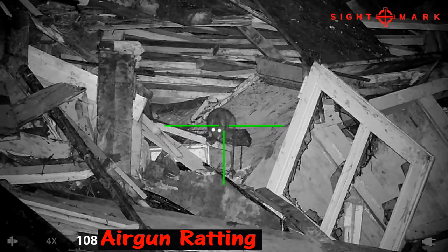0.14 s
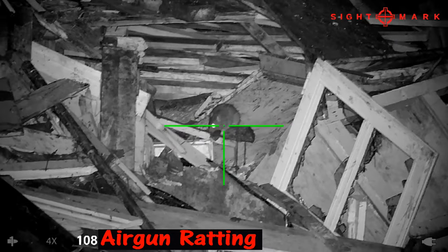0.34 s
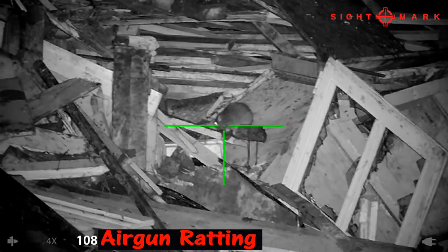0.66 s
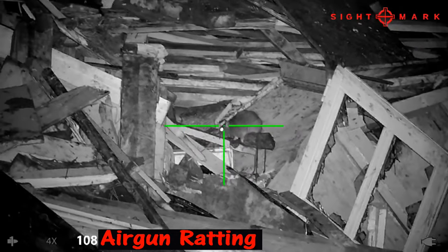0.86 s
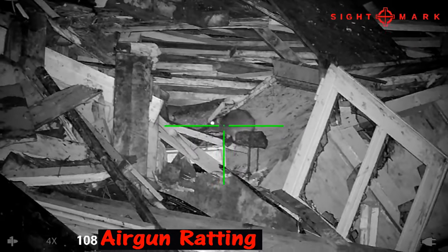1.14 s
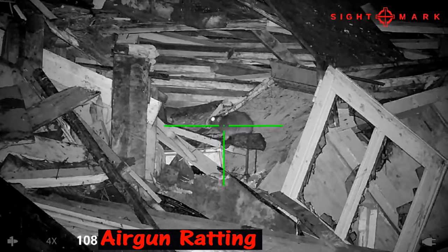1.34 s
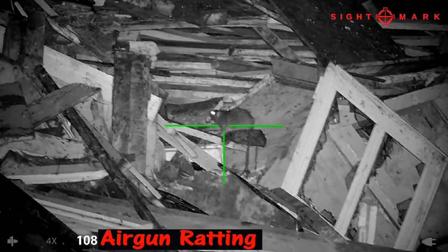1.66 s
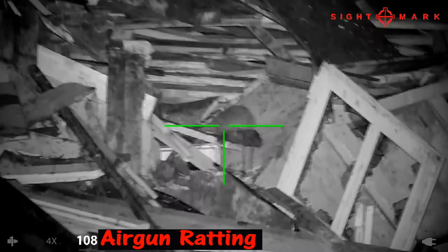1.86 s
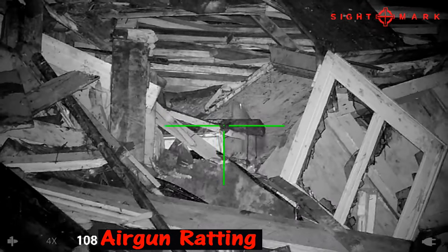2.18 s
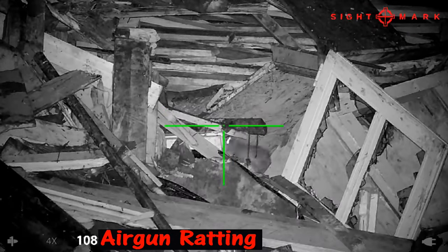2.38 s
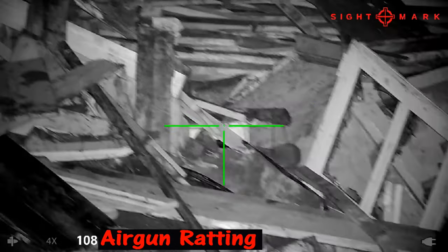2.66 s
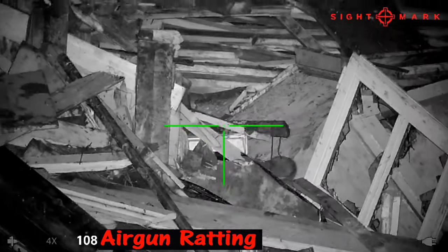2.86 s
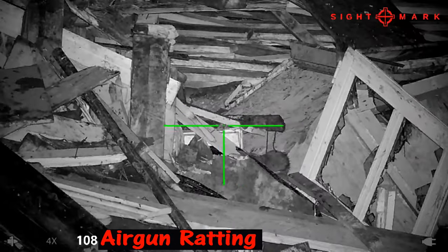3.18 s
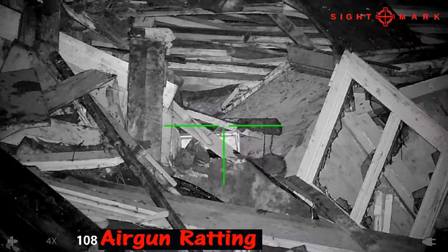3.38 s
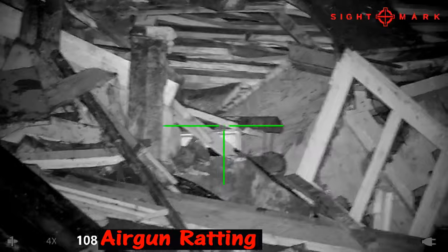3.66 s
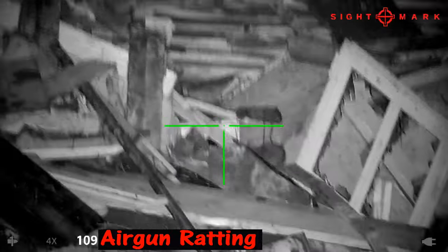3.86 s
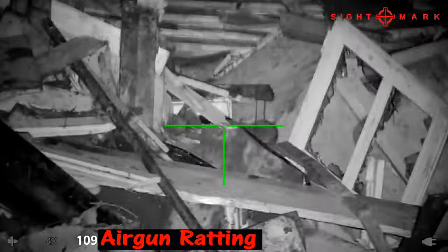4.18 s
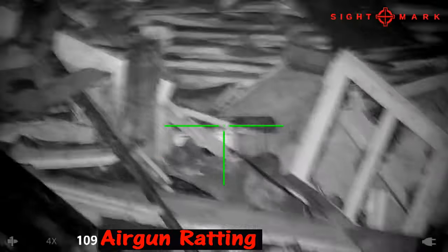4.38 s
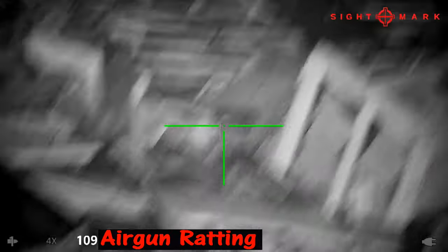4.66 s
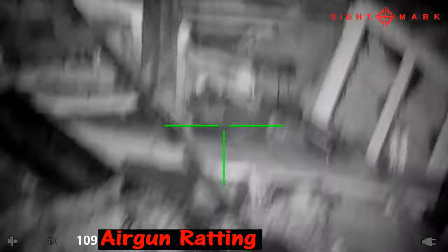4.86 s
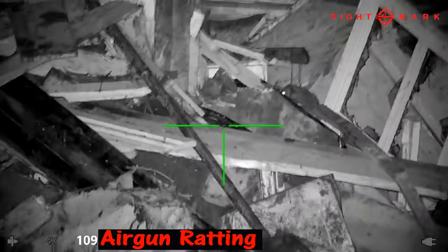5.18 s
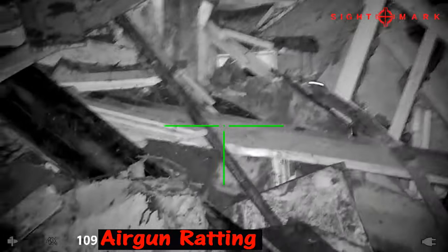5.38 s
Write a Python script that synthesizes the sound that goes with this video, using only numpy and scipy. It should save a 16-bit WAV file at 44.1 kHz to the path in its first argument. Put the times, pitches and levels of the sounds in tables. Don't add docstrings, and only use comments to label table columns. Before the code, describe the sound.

Quiet night hiss, a sharp overloaded air-gun blast, a woody smack and rattling echoes, later metal clicks as the gun is recocked.

```python
import sys
import numpy as np
from scipy import signal
from scipy.fft import rfft, irfft
from scipy.io import wavfile

SR = 44100
rng = np.random.default_rng(int(sys.argv[2]) if len(sys.argv) > 2 else 0)


def volts(x):
    e = np.asarray(x, float) / 20
    return 10 ** e


def inscribe(sig):
    pcm = np.round(np.clip(np.atleast_2d(sig).T, -1, 1) * 32767)
    wavfile.write(sys.argv[1], SR, pcm.astype(np.int16))


N = 243873
TIME = np.arange(N) / SR
SOFT_DB = -60


def shaped(x, spectrum):
    hz, db = np.transpose(spectrum)
    grid = np.maximum(np.fft.rfftfreq(len(x), 1 / SR), 1)
    gain = volts(np.interp(np.log(grid), np.log(hz), db))
    y = irfft(rfft(x) * gain, len(x))
    return y / np.sqrt(np.mean(y ** 2))


def drift(rate):
    hop, settle = 40, 2000
    r = np.exp(-2 * np.pi * hop * rate / SR)
    white = rng.standard_normal(N // hop + settle + 2)
    slow = signal.lfilter([1], [1, -2 * r, r * r], white)[settle:]
    return np.interp(np.arange(N) / hop, np.arange(len(slow)), slow / slow.std())


def decay(start, rise, t60, time=TIME):
    t = np.maximum(time - start, 0)
    return (1 - np.exp(-t / rise)) ** 2 * volts(-60 * t / t60)


def ring(x, hz, t60):
    r, w = volts(-60 / (t60 * SR)), 2 * np.pi * hz / SR
    return signal.lfilter([0, np.sin(w)], [1, -2 * r * np.cos(w), r * r], x + 1e-18)


def band(x, low_hz, high_hz):
    sos = signal.butter(2, [low_hz, min(high_hz, SR / 2.2)], "band", fs=SR, output="sos")
    return signal.sosfilt(sos, x) * np.sqrt(SR / 2 / (high_hz - low_hz))


def high_pass(x, order, hz):
    return signal.sosfilt(signal.butter(order, hz, "high", fs=SR, output="sos"), x)


def top_one(x):
    return x / np.abs(x).max()


def placed(x, start):
    out, at = np.zeros(N), round(start * SR)
    out[at:at + len(x)] = x[:N - at]
    return out


def yard_tail(colour, rise, lumps_db):
    # pitch_hz, t60_s
    yard_t60 = [(300, 1.3), (800, 0.74), (2000, 1.146), (3300, 0.98), (4900, 1.0), (6500, .55),
                (9000, 0.55), (14000, .4)]
    hz, t60 = np.transpose(yard_t60)
    time, out = TIME[:int(1.3 * SR)], 0
    noises = [shaped(white, colour) for white in rng.standard_normal((2, len(time)))]
    edges = 140 * 2 ** np.arange(0, 7.1, .5)
    for k, (low, high) in enumerate(zip(edges, edges[1:])):
        sos = signal.butter(2, [low, high], "band", fs=SR, output="sos")
        band_t60 = np.interp(np.log(low * high) / 2, np.log(hz), t60)
        out = out + signal.sosfilt(sos, noises[k % 2]) * decay(0, rise, band_t60, time)
    return out * volts(lumps_db * drift(25)[:len(time)])


def struck(rows, load, loose_db):
    lead = 6 * load
    out, time = np.zeros(N), TIME[:20000] - lead
    flutter = drift(40)
    for (s, hz, db, t60), phase in zip(rows, rng.uniform(0, 2 * np.pi, len(rows))):
        swell = np.exp(np.minimum(time, 0) / load)
        free = volts(-60 * np.maximum(time, 0) / t60)
        waver = volts(loose_db * flutter[rng.integers(N // 2):][:len(time)])
        shape = np.where(time < 0, swell, free) * waver
        out += volts(db) * placed(shape * np.sin(2 * np.pi * hz * time + phase), s - lead)
    return out


def night():
    # pitch_hz, level_db per Hz
    hum_colour = [(35, -40.5), (60, -9), (134, -1), (249, -2.5), (279, -1.5), (644, -8), (699, -7),
                  (734, -9.5), (908, -11.5), (1370, -19.5), (3000, -28.5), (3900, -55), (6600, -120)]
    # pitch_hz, level_db rms
    motor_lines = [(140.0, -83), (274.5, -83)]
    # pitch_hz, level_db per Hz
    hiss_colour = [(880, -30.5), (1500, -4), (2270, -6), (2460, -6), (3770, -3.5), (13300, -10),
                   (15800, -11.5), (16100, -45)]
    # start_s, hum_db
    road_level = [
        (0, -75),
        (.5, -74.5),
        (1.35, -71.5),
        (1.7, -73),
        (3.3, -70.5),
        (4.05, -65),
        (4.55, -66),
        (4.85, -64),
        (5.53, -68),
    ]
    # start_s, thud_db
    hand_level = [
        (0, -74.5),
        (.3, -77),
        (1.0, -75.5),
        (1.35, -86),
        (2.5, -74.5),
        (3.5, -78.5),
        (4.25, -79.5),
        (4.65, -63.5),
        (5.35, -80.5),
    ]
    hum_db = np.interp(TIME, *np.transpose(road_level))
    thud_db = np.interp(TIME, *np.transpose(hand_level))
    stir_db = thud_db + 78
    road = [shaped(white, hum_colour) for white in rng.standard_normal((3, N))]
    hum = band(road[0], 150, 600) * volts(hum_db - 16 + 0.9 * drift(8))
    rush = band(road[1], 540, 4000) * volts(-75 + .15 * stir_db + 0.8 * drift(8))
    thud = band(road[2], 53, 180) * volts(thud_db - 18 + 3.5 * drift(6.2))
    lines = sum(volts(db + 1.5 + 1.3 * drift(2)) * np.sin(2 * np.pi * hz * TIME) for hz, db in motor_lines)
    wind_colour = [(10, -10), (22, 1.5), (40, -7), (70, -15), (120, -41.5), (400, -100)]
    wind = shaped(rng.standard_normal(N), wind_colour)
    wind *= volts(-74 + 1.1 * stir_db + 2.5 * drift(4))
    hiss = volts(-76.4) * shaped(rng.standard_normal(N), hiss_colour)
    return hum + rush + thud + lines + wind + hiss


def shot():
    hammer_s, blast_s = 1.8145, 1.8213
    # pitch_hz, level_db per Hz
    blast_colour = [(88, -39), (150, -11), (259, -15.5), (514, -6), (1020, -7), (1690, -3.5), (2140, -9),
                    (3290, -2.5), (4760, -0.5), (5790, -7.5), (6390, -3), (9820, -5.5), (16000, -25)]
    # pitch_hz, level_db, t60_s
    stock_modes = [(105, -36, 0.36), (129.5, -35, .26), (235, -46, .22), (162, -36, 0.087),
                   (209, -31.5, 0.042), (696, -13, 0.026), (400.6, -28.5, .07)]
    # pitch_hz, level_db per Hz
    near_colour = [(120, -30.5), (230, -12), (330, -12.5), (700, -4), (1020, -5), (2170, -8.5), (4770, -4),
                   (7830, -7), (11000, -14.5), (16000, -27.5)]
    air = shaped(rng.standard_normal(N), blast_colour)
    t = np.maximum(TIME - blast_s, 0)
    shutting_db = -np.minimum(30 * (t / 0.044) ** 4.5, 90)
    valve = decay(blast_s, 0.00056, 0.3016) * volts(shutting_db)
    hammer = band(rng.standard_normal(N), 900, 9000) * decay(hammer_s, 0.0013, 0.058)
    recoil = decay(blast_s, 0.002099, .06) * rng.standard_normal(N) * .05
    recoil[round(blast_s * SR)] += 1
    thump = 0
    for hz, db, t60 in stock_modes:
        late = np.roll(recoil, round(1.1 * SR / hz))
        thump = thump + volts(db) * ring(late, hz, t60)
    settle = volts(-37.5) * air * decay(blast_s, .01, 0.44)
    wall = volts(-39.5) * placed(yard_tail(near_colour, .008, lumps_db=0), blast_s + 0.071)
    dull = band(air, 1500, 7000) * .45
    jet = dull + (air - dull) * decay(blast_s, 0.0045, 1)
    turbulence = volts((0.4 + 34 * np.minimum(t, .05)) * drift(400.8))
    return volts(-5) * jet * turbulence * valve + volts(-35) * hammer + thump + settle + wall


def smack():
    smack_s = 1.9948
    # pitch_hz, level_db per Hz
    smack_colour = [(120, -48.5), (200, -24.5), (1060, 0), (1710, -6.5), (2380, 0.5), (2910, -11),
                    (3490, -1.5), (3970, -6), (4770, 2.5), (5940, -12.5), (6520, -5.5), (7410, -13),
                    (16000, -34)]
    # pitch_hz, level_db per Hz
    far_colour = [(120, -46), (250, -13), (500, -4), (900, 2), (1300, 2), (1700, -5), (2100, 0),
                  (2600, -8.5), (3800, -12), (5000, -7), (5500, -21), (7000, -22.5), (9000, -25.5),
                  (16000, -44.5)]
    # delay_s, level_db, t60_s
    wall_echoes = [
        (0.016, -11.5, 0.044),
        (0.019, -11.5, 0.031),
        (0.047, -14, 0.051),
        (.134, -17, .03),
        (.155, -37, 0.033),
        (.215, -33.5, .1),
        (.243, -25, 0.029),
        (0.303, -35.5, 0.15),
    ]
    # pitch_hz, level_db, t60_s
    plank_modes = [(382.6, -34.5, .035), (760, -25, .035), (980, -22, 0.041), (1125, -25.5, 0.037),
                   (1450, -19.5, 0.017), (1945, -24, 0.034), (2471, -25, .025), (3560, -29, .025),
                   (4880, -19, 0.02), (5278, -26.5, 0.0298), (6373, -30, 0.026)]
    wood = shaped(rng.standard_normal(N), smack_colour) * volts(1.33 * drift(300))
    far = shaped(rng.standard_normal(N), far_colour)
    echoes = sum(volts(db) * decay(smack_s + s, .0018, t60) for s, db, t60 in wall_echoes)
    split = volts(-9 * np.clip((TIME - smack_s - .0088) / 0.00115, 0, 1))
    direct = decay(smack_s, .0002, 0.093) * split + 0.3976 * decay(smack_s, 0.00013, 0.01145)
    hit = wood * direct + (far + 0.32 * wood) * echoes
    hit = high_pass(hit, 4, 300)
    tail = volts(-42) * placed(yard_tail(far_colour, .004, lumps_db=1.7), smack_s)
    modes = [(smack_s + .0012, hz, db, t60) for hz, db, t60 in plank_modes]
    body = high_pass(struck(modes, load=0.00019, loose_db=3), 4, 280)
    return volts(-17) * hit + body + tail


def touches():
    # start_s, level_db (peak), pitch_hz (main ring), brightness_db
    ticks = [(2.65, -59, 1700, 0), (2.655, -55, 1150, 6), (2.7147, -67, 3370, 4), (2.746, -67, 2280, 0),
             (2.832, -68, 6000, 10), (3.6894, -60, 3700, 6), (4.1069, -51, 3480, 14),
             (4.4153, -45, 3900, 6), (4.4253, -30.5, 3300, -4), (4.4831, -63, 4540, -6),
             (4.6, -41, 3080, -9), (4.6149, -52, 2800, 4), (4.6229, -25.5, 4160, 2.5),
             (4.649, -27.5, 3720, 9.5), (4.653, -31.5, 3700, 17), (4.6637, -51.5, 2690, -13),
             (4.7186, -51, 4070, 19), (4.801, -57, 3120, -17.5), (4.8077, -41, 3100, 6),
             (4.894, -52, 3660, 20), (4.9145, -48.5, 3780, 7), (4.925, -57, 2240, 2),
             (5.0008, -58, 3700, 0), (5.0128, -64, 3960, 2), (5.3583, -62, 3230, 11),
             (5.4845, -58, 4200, 3)]
    # start_s, level_db (peak), pitch_hz (main ring), brightness_db
    rattles = [
        (4.3396, -52.5, 4050, -4),
        (4.3852, -46.5, 4020, 1),
        (4.4261, -29, 3260, 0),
        (4.498, -59.5, 4010, 2),
        (4.5827, -53.5, 3100, -8),
        (4.6253, -30, 3770, 4),
        (4.8206, -41, 2930, -4.5),
        (4.8994, -49, 3970, -2),
        (5.0477, -45, 4100, -0.5),
        (5.3314, -66, 4570, 7),
    ]
    bounce_s, stretch = 0.0056, 1.8
    rows = ticks + rattles
    for (s, db, hz, bright_db), (up, down) in zip(rattles, rng.normal(0, 0.088, (len(rattles), 2))):
        loss_db = 1.5 + 0.44 * (db - SOFT_DB)
        first = (s + bounce_s, db - loss_db, hz * np.exp(up), bright_db)
        second_s = s + bounce_s * (1 + stretch)
        second = (second_s, db - 1.8 * loss_db, hz * np.exp(down), bright_db - 6)
        rows += [first, second]
    return rows


def contacts():
    time, out, rows = TIME[:3000], np.zeros(N), touches()
    noise = rng.standard_normal((len(rows), len(time)))
    for white, (s, db, hz, bright_db) in zip(noise, rows):
        burst = white * decay(0, 0.0005, 0.018, time)
        core = top_one(band(burst, hz * 0.87, hz * 1.17))
        skirt = top_one(band(burst, hz * 0.62, hz * 1.74))
        body = top_one(band(band(burst, 1160, 1660), 860, 2020))
        edge = top_one(band(burst, 6030, 9600) + 0.61 * band(burst, 11200, 15500))
        edge_db = -19 + 0.86 * bright_db - .2 * (db - SOFT_DB)
        zones = top_one(core + 1.28 * skirt) + volts(-12 - bright_db) * body + volts(edge_db) * edge
        out += volts(db + 2) * placed(zones, s - .0005)
    return out


def stops():
    open_s, shut_s = 4.428, 4.6465
    # pitch_hz, level_db, t60_s
    open_ring = [(1307, -51, .12), (2860, -60, .2), (2905, -60, 0.32), (3500, -63, .16), (4500, -46, 0.035),
                 (8100, -39, 0.0094), (714, -44.5, 0.016)]
    # pitch_hz, level_db, t60_s
    shut_ring = [(1300, -35, 0.017), (1820, -32.5, .012), (3605, -26, 0.018), (6428, -60, .12),
                 (9600, -58, .4), (9700, -59, .14), (11200, -53, .22), (12920, -58, .07)]
    # pitch_hz, level_db
    shut_crack = [(3650, -11), (4900, -24), (5350, -16), (5950, -16), (7100, -15), (7900, -15), (8600, -23),
                  (9800, -22), (11250, -24), (12600, -35), (13900, -28), (15600, -38)]
    # start_s, pitch_hz, level_db, t60_s
    jolts = [(4.375, 105, -59, .1), (4.428, 322, -51, 0.045), (4.435, 100, -54, 0.14),
             (4.595, 116, -51, 0.14), (4.628, 121, -54, 0.11), (4.645, 329, -52.5, 0.095),
             (4.835, 111, -50.5, 0.1), (4.898, 320, -55, 0.069), (4.91, 124, -57, 0.14),
             (5.02, 101, -58.5, 0.087), (5.055, 114, -59, .1), (5.185, 124, -61, 0.11)]
    answer_colour = [(600, -32), (2900, -18), (3600, 4), (4600, -4), (6000, -2.5), (9600, -13), (15000, -20)]
    answer = yard_tail(answer_colour, 0.0058, lumps_db=2.5)
    answer = answer * decay(0, .001, 1.2, TIME[:len(answer)])
    lever = [(open_s, *mode) for mode in open_ring] + [(shut_s, *mode) for mode in shut_ring]
    lever += [(shut_s, hz, db, 0.0056) for hz, db in shut_crack]
    metal = struck(lever, load=0.00034, loose_db=2)
    return metal + volts(-59.5) * placed(answer, 4.69) + struck(jolts, load=0.0059, loose_db=1.5)


def housing(x):
    echo_s = .000625
    hz = np.fft.rfftfreq(N, 1 / SR)
    back = np.clip(0.22 * hz / (hz + 2500), 0, .7) * np.exp(-2j * np.pi * hz * echo_s)
    return irfft(rfft(x) * np.sqrt(1 - np.abs(back) ** 2) / (1 - back), N)


def scene():
    return (housing(shot() + smack() + contacts()) + stops() + night())[None]


def top_cut(x):
    return signal.sosfilt(signal.butter(12, 16800, fs=SR, output="sos"), x)


def record(dry):
    ceiling = .42
    loud = dry / (1 + np.abs(dry / ceiling) ** 5) ** (1 / 5)
    coupled = high_pass(loud, 3, 70)
    cut = signal.sosfilt(signal.cheby2(12, 50, 16900, fs=SR, output="sos"), coupled)
    return top_cut(cut)


dry = scene()
out = record(dry)
inscribe(out)
```